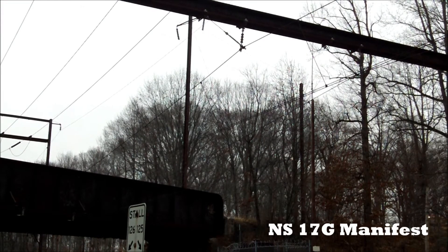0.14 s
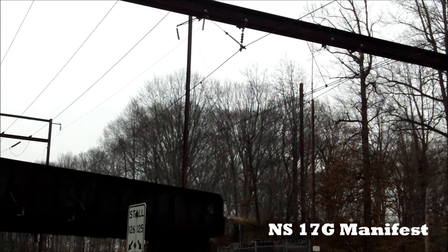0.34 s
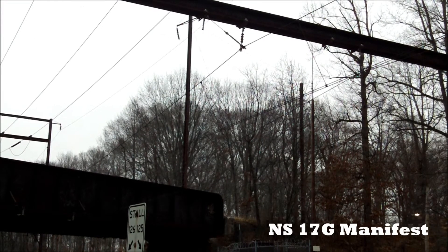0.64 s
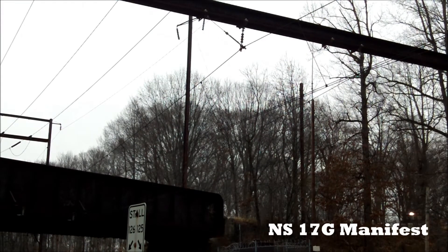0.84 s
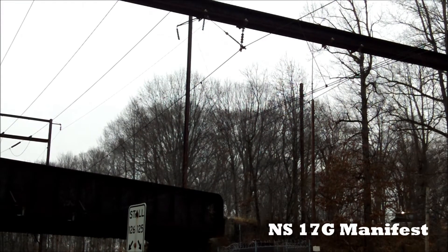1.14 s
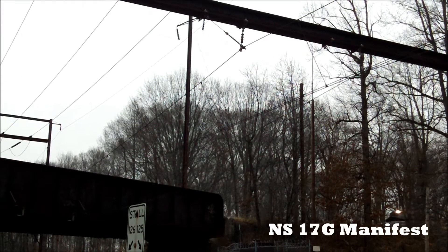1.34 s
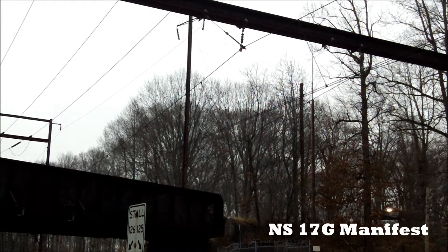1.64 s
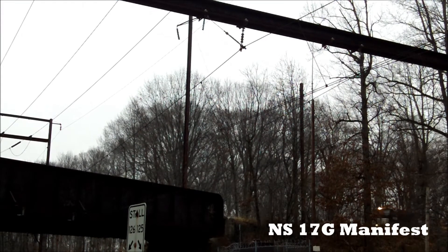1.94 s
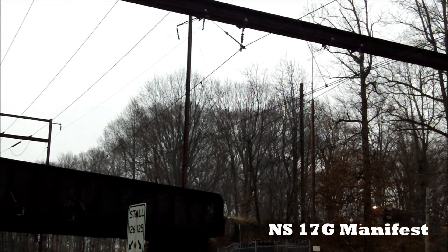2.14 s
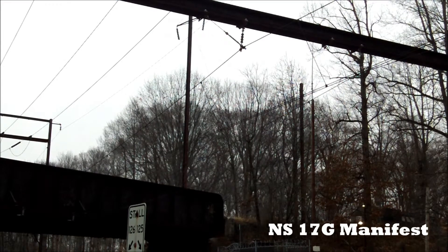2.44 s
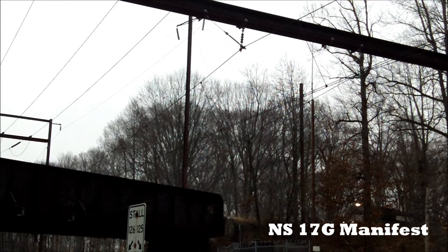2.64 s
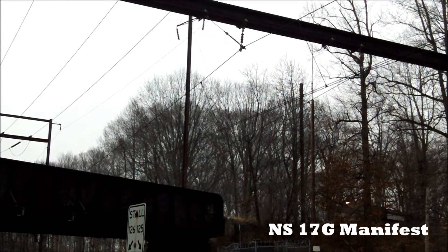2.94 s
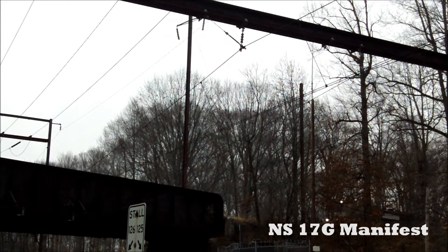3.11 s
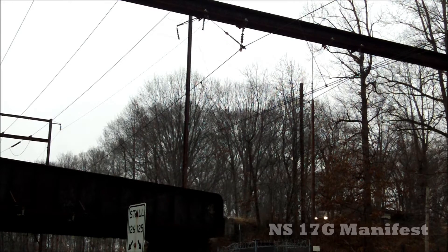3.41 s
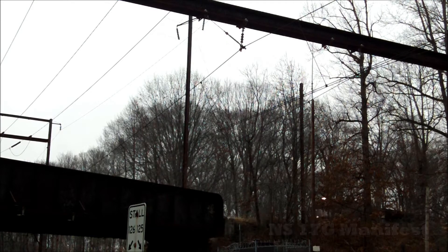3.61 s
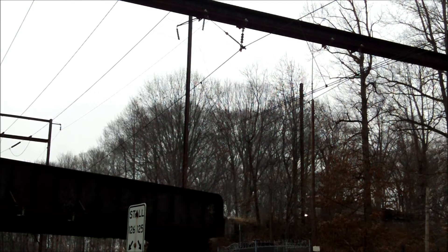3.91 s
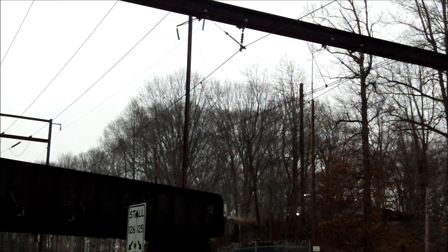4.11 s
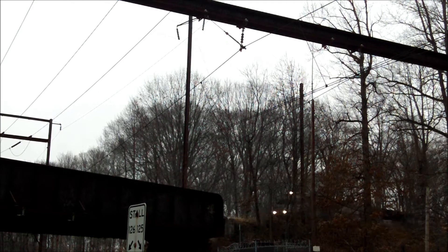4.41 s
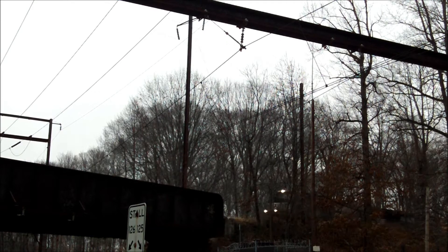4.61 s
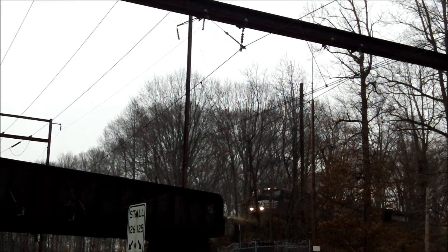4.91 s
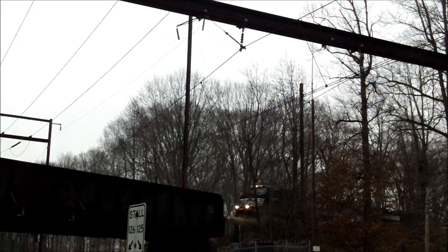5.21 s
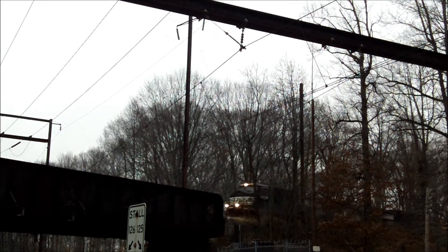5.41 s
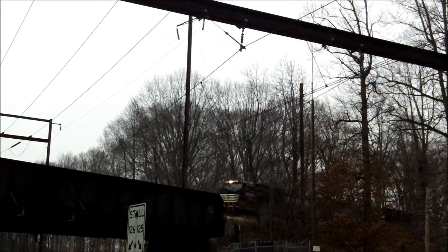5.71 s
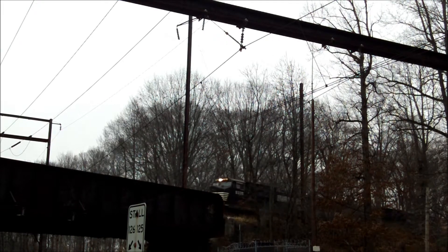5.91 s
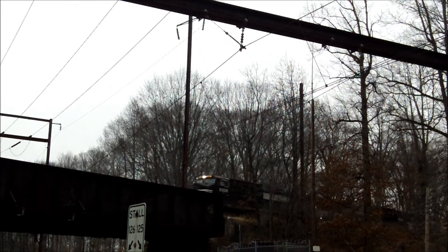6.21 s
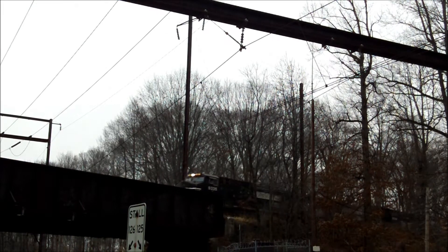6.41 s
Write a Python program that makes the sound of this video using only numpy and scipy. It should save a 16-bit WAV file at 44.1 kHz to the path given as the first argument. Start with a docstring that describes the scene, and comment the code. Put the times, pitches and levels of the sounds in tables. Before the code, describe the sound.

From beneath a bridge, a nearing diesel locomotive is a deep, pulsing beat with ground rumble and rushing wheel noise. Close drips splat before a valve releases a hiss of air. The bass peaks just past the middle and fades, while the wheels roar on with a faint fan whine, short swells of hum and a howl from the rails. Another loud hiss and one brief spurt of air come last.

```python
"""Diesel locomotive from under a steel bridge

A small camera under the bridge hears the engine climb towards it through bare woods. The uneven exhaust
beat throbs in the bass until the bank masks it; wheels and fans roar, and air valves blow off twice and
spit once. Drips tick close to the microphone, and the camera adds hiss and a thin whine."""
import sys
import numpy as np
from scipy import signal
from scipy.fft import rfft, irfft, next_fast_len
from scipy.io import wavfile
from scipy.ndimage import uniform_filter1d, map_coordinates

SR = 44100
rng = np.random.default_rng(int(sys.argv[2]) if len(sys.argv) > 2 else 0)


def int16_out(signal):
    """Quantize to a 16-bit WAV file."""
    q = np.round(np.clip(np.atleast_2d(signal).T, -1, 1) * 32767)
    wavfile.write(sys.argv[1], SR, q.astype(np.int16))


N = 288855

CYCLE_HZ = 4.9455  # engine cycles of two crank turns
STACK_HZ, STACK_WIDTH_HZ = 67.8, 30
DRONE_HZ, DRONE_CREST_S = 64.084, .0038  # just under the 13th engine order
CAMERA_WHINE_HZ, FRAME_HZ, BAND_LIMIT_HZ = 14985, 29.97, 15300

# The twelve cylinders. Each row: crank angle in degrees, relative puff strength in dB.
CYLINDERS = [(107, -34.2), (141, -48.0), (195, -35.5), (249, -37.7), (316, -39.0), (367, -31.8),
             (450, -34.7), (510, -39.9), (533, -40.8), (634, -37.3), (698, -32.5), (719, -30.8)]
# The engine from under the bridge. Each row: time in seconds, exhaust beat in dB, ground rumble in dB.
ENGINE_LEVELS = [(0, -22.5, -30), (2.0, -23, -24), (3.3, -22, -28), (3.9, -18.5, -26), (4.45, -36.5, -24),
                 (5.2, -32, -24), (5.65, -59.5, -27), (5.9, -50, -25), (6.55, -63, -20.5)]
# The bass drone and the gears. Each row: time in seconds, level in dB.
DRONE_LEVELS = [(0, -27), (.5, -25), (1.2, -30), (2.65, -43), (3.05, -27), (3.7, -21.5), (3.9, -17),
                (4.15, -16), (4.3, -20), (4.5, -33), (5.2, -50), (5.9, -50), (6.55, -28)]
GEAR_LEVELS = [(0, -56), (1.9, -51.5), (3.0, -42.5), (3.9, -47), (4.3, -53), (5.3, -57), (6.55, -44)]
# Wheels on the rail. Each row: time in seconds, roar in dB, sizzle in dB.
WHEEL_LEVELS = [(0, -35.5, -50), (1.2, -35, -50), (1.8, -33.5, -52), (2.3, -34.5, -49), (2.7, -32.5, -45),
                (3.6, -32.5, -45), (4.1, -33.5, -48.5), (5.5, -34, -48), (5.9, -32.5, -44),
                (6.55, -32.5, -50)]
# Rail howl and blower whine. Each row: time in seconds, pitch in Hz, level in dB.
HOWL_PATH = [(0, 645, -54), (2.4, 665, -49.5), (3.6, 632, -41.5), (4.8, 632, -44.5), (5.5, 590, -37.5),
             (5.9, 563, -37.5), (6.55, 568, -37)]
BLOWER_PATH = [(0, 1045, -62), (.85, 1045, -56), (1.15, 1048, -48), (2.3, 1048, -52), (2.9, 1045, -47),
               (3.8, 1042, -43.5), (4.3, 1035, -49), (4.9, 960, -49), (5.7, 910, -51), (6.55, 865, -50)]
# Swells of motor hum. Each row: centre in seconds, half length in seconds, peak in dB.
MOTOR_SWELLS = [(3.22, 0.076, -44.5), (3.68, 0.077, -39), (4.107, 0.089, -42.5), (4.596, 0.17, -43),
                (5.06, 0.16, -38), (5.55, 0.06, -35), (5.762, 0.046, -40), (5.98, 0.08, -35.5),
                (6.186, 0.057, -34.5)]
# Two soft tones. Each row: centre in seconds, half length in seconds, pitch in Hz, peak in dB.
SOFT_TONES = [(0.293, 0.15, 875, -42), (0.593, 0.11, 755, -44.5)]
# Drips by the microphone. Each row: start in seconds, ping gain in dB, ping pitch in Hz,
# smack gain in dB, smack pitch in Hz, seconds to fade by 60 dB.
LOUD_DRIPS = [(.2975, -44, 9500, -28, 3900, .025), (.4723, -48, 11000, -8, 1900, .012),
              (.5217, -52, 9500, -42, 4500, .008), (.7058, -32, 9800, -23, 5950, .02),
              (.7194, -54, 8900, -46, 5700, .04), (.7771, -51, 10600, -57, 5500, .012),
              (.9438, -50, 11000, -60, 5000, .012), (2.5701, -45, 10000, -58, 5000, .05),
              (2.6165, -43, 10000, -54, 6000, .012), (2.6658, -47, 9600, -30, 3000, .012)]
# Air blasts. Each row: start in seconds, level in dB, treble rise in seconds, hold in seconds,
# fade in dB a second, treble share in dB.
AIR_BLASTS = [(1.07, -36.5, 0.068, 0.22, 23, -6), (5.718, -33, 0.094, 0.11, 22, -2),
              (6.408, -39, 0.016, 0.02, 226, -3.5)]
# Whistles in the jet. Each row: pitch in Hz, width in Hz, relative strength in dB.
JET_WHISTLES = [(2560, 42, 14.5), (2960, 63, 4.5), (3050, 11, 7.5), (3300, 53, -14)]

# The colour of each noise. Each row: frequency in Hz, relative spectral density in dB.
GROUND_SPECTRUM = [(8, -25.5), (18, -19), (40, -4.5), (62, -0.5), (85, -5.5), (110, -16.5), (140, -32.5),
                   (200, -59)]
ROAR_SPECTRUM = [(90, -62), (128, 3), (146, 3.5), (165, -4.5), (240, -0.5), (300, -2), (480, -3),
                 (800, -5.5), (1050, -4.5), (1500, -9), (2000, -16), (2300, -25), (4000, -39), (6000, -85)]
SIZZLE_SPECTRUM = [(900, -37), (1700, -2), (2000, -2), (2200, -4), (3800, -13.5), (5500, -22.5),
                   (7000, -34.5), (9500, -44.5), (15000, -72.5)]
JET_BODY_SPECTRUM = [(500, -33), (900, -4), (1600, 2.5), (2500, -1.5), (3500, -6.5), (5500, -39.5)]
JET_EDGE_SPECTRUM = [(1900, -18.5), (2650, 0.5), (3500, 1.5), (4600, -3.5), (6000, -11.5), (7400, -20),
                     (8200, -44)]
JET_SPRAY_SPECTRUM = [(7000, -21), (8800, 2), (10500, -1.5), (12500, -6), (15300, -13.5)]
HISS_SPECTRUM = [(5000, -34.5), (8000, -3), (9500, -3.5), (12800, -0.5), (14000, -2), (15300, -6)]
SIDE_HISS_SPECTRUM = [(400, -25.5), (1400, -14.5), (4000, -10), (8000, -3), (14500, 3), (15300, -1)]


def amp(db):
    return 10 ** (np.asarray(db) / 20)


def unit(x):
    return x / np.sqrt(np.mean(x ** 2) + 1e-20)


def curves(rows):
    """One value per sample for each column after the time."""
    times, *columns = np.transpose(rows)
    return [np.interp(np.arange(N) / SR, times, column) for column in columns]


def wobble(rate):
    """A smooth random curve, rate knots a second."""
    return map_coordinates(rng.standard_normal(int(N * rate / SR) + 4), [np.arange(N) * rate / SR])


def filtered(x, response):
    """x through a frequency response."""
    size = next_fast_len(len(x) + SR)
    return irfft(rfft(x, size) * response(np.fft.rfftfreq(size, 1 / SR)), size)[:len(x)]


def shape(points):
    """A response through (Hz, dB) points on a log axis."""
    f, db = np.transpose(points)
    return lambda hz: amp(np.interp(np.log(hz + 1), np.log(f + 1), db, -120, -120))


def resonance(f, hz, width_hz):
    """Response at f of one resonance with peak gain 1."""
    return 1j * f * width_hz / (hz * hz - f * f + 1j * f * width_hz)


def rush(response, patchy_db):
    """Coloured noise of rms 1 with patches of random gain in time and frequency."""
    spectra = signal.stft(rng.standard_normal(N), nperseg=512)[2]
    patches = uniform_filter1d(uniform_filter1d(rng.standard_normal(spectra.shape), 5, 0), 16, 1)
    noise = signal.istft(spectra * amp(patchy_db * unit(patches)), nperseg=512)[1][:N]
    return unit(filtered(noise, response))


def wavering(hz, waver_hz, rate):
    """A sine of rms 1 whose pitch wanders."""
    return np.sqrt(2) * np.sin(2 * np.pi * np.cumsum(hz + waver_hz * wobble(rate)) / SR)


def swell(t, centre, half_length, peak_db):
    """A bell-shaped gain curve."""
    return amp(peak_db - 9.2 * ((t - centre) / half_length) ** 2)


def dip_db(t):
    """A brief drop in level shared by wheels, gears, rail and blower."""
    return -2.5 * np.exp(-((t - 4.24) / .12) ** 2)


def engine(t):
    """Each cylinder puffs once a cycle into the stack; a drone beats against it, the ground rumbles."""
    beat_db, rumble_db = curves(ENGINE_LEVELS)
    drone_db, = curves(DRONE_LEVELS)
    angle, puff_db = np.transpose(CYLINDERS)
    cycles = np.arange(int(N / SR * CYCLE_HZ) + 1)[:, None]
    firings = np.round((cycles + angle / 720) / CYCLE_HZ * SR).astype(int)
    strengths = amp(puff_db + .6 * rng.standard_normal(firings.shape))
    puffs = np.bincount(firings.ravel(), strengths.ravel(), N)
    # the stack rings twice over; the silencer stops the upper orders
    exhaust = lambda f: resonance(f, STACK_HZ, STACK_WIDTH_HZ) ** 2 / (1 + (f / 108) ** 8)
    beat = unit(filtered(puffs, exhaust)[:N])
    drone = np.sqrt(2) * np.cos(2 * np.pi * DRONE_HZ * (t - DRONE_CREST_S))
    rumble = rush(shape(GROUND_SPECTRUM), patchy_db=.47)
    return amp(beat_db) * beat + amp(drone_db) * drone + amp(rumble_db) * rumble


def wheels(t):
    """Wheels roll on the rail: a broad roar with a sizzle above it."""
    roar_db, sizzle_db = curves(WHEEL_LEVELS)
    roar = amp(roar_db + dip_db(t) + .061 * wobble(3.6)) * rush(shape(ROAR_SPECTRUM), patchy_db=.7)
    sizzle_gain = amp(sizzle_db + 1.5 * dip_db(t) + .56 * wobble(6.3))
    return roar + sizzle_gain * rush(shape(SIZZLE_SPECTRUM), patchy_db=.7)


def rail_howl(t):
    """The rail howls in a drifting band: slow noise shifted up to the howl's pitch."""
    hz, db = curves(HOWL_PATH)
    slow_noise = rush(lambda f: 1 / (1 + (f / 52) ** 4), patchy_db=-.6)
    return amp(db + dip_db(t)) * slow_noise * wavering(hz, waver_hz=8.31, rate=5)


def gears(t):
    """Gears grind in a rough band near 2 kHz."""
    db, = curves(GEAR_LEVELS)
    band = shape([(1500, -26.5), (1850, 4), (2030, 3.5), (2150, -27)])
    return amp(db + dip_db(t)) * rush(band, patchy_db=2.5)


def motor(t):
    """An unsteady hum comes in short swells over a slowly growing floor."""
    floor = amp(-62 + 2 * t)
    swells = sum(swell(t, *row) for row in MOTOR_SWELLS)
    return (floor + swells) * wavering(209.5, waver_hz=3, rate=14)


def blower(t):
    """The fan's fluttering whine sinks as the engine draws level with the microphone."""
    hz, db = curves(BLOWER_PATH)
    flutter_db = 2.2 * wobble(16) + 2.5 * wobble(3.09)
    return amp(db + dip_db(t) + flutter_db) * wavering(hz, waver_hz=9, rate=14)


def soft_tones(t):
    """Two short tones from the machinery, the second lower."""
    return sum(swell(t, centre, half_length, db) * wavering(hz, waver_hz=1.8, rate=6.9)
               for centre, half_length, hz, db in SOFT_TONES)


def drips():
    """Drops splat close to the microphone, each a high ping over a lower smack and a knock."""
    faint = [(N / SR * when, -60 - 2 * np.log(size), 8500 + 5000 * pitch, -64, 5000, .008)
             for when, size, pitch in rng.random((90, 3))]
    ring = lambda x, hz, q: signal.lfilter(*signal.iirpeak(hz, q, SR), x)
    ring_twice = lambda x, hz, q: ring(ring(x, hz, q), hz, q)
    out, age = np.zeros(N + SR), np.arange(SR // 16) / SR
    for start, ping_db, ping_hz, smack_db, smack_hz, t60 in LOUD_DRIPS + faint:
        envelope = amp(-60 * age / t60) * np.clip(age / .00048, 0, 1)
        splat = envelope * rng.standard_normal((2, len(age)))
        ping = ring(splat[0], ping_hz, q=2.5)
        knock = amp(10) * ring_twice(splat[0], hz=2200, q=1.5)
        smack = ring_twice(splat[1], smack_hz, q=3.5)
        out[round(start * SR):][:len(age)] += amp(ping_db) * (ping + knock) + amp(smack_db) * smack
    return out[:N]


def air_valves(t):
    """Compressed air jets out: each blast rises, holds and fades, its treble ahead of its body."""
    whistles = lambda f: sum(amp(db) * abs(resonance(f, hz, width)) for hz, width, db in JET_WHISTLES)
    body = rush(lambda f: shape(JET_BODY_SPECTRUM)(f) * (1 + .25 * whistles(f)), patchy_db=.6)
    edge = rush(shape(JET_EDGE_SPECTRUM), patchy_db=.7)
    spray = rush(shape(JET_SPRAY_SPECTRUM), patchy_db=.8)
    out = np.zeros(N)
    for start, jet_db, rise, hold, fade_db_per_s, treble_db in AIR_BLASTS:
        level = amp(jet_db - fade_db_per_s * np.clip(t - start - rise - hold, 0, None))
        opened = lambda span: np.clip((t - start) / span, 0, 1)
        # distance dulls the jet, the high spray by twice as many dB as the edge
        treble = amp(treble_db) * edge + amp(2 * treble_db - 20.5) * spray
        out += level * (opened(1.3 * rise) * body + opened(rise) * treble)
    return out


def scene():
    """All that reaches the one spot under the bridge, alike in both channels."""
    t = np.arange(N) / SR
    train = engine(t) + wheels(t) + rail_howl(t) + gears(t) + motor(t) + blower(t) + soft_tones(t)
    mono = train + drips() + air_valves(t)
    return np.array([mono, mono])


def record(dry):
    """The camera's one capsule has a notch near 8 kHz; hiss flickers, a whine is chopped once a frame."""
    t = np.arange(N) / SR
    slot = lambda f: 1 - .9 * abs(resonance(f, 7970, 220)) ** 2
    notch = lambda f: slot(f) * (1 - .31 * abs(resonance(f, 7950, 900)) ** 2)
    hiss = amp(-71.5 + 1.5 * wobble(30) + .8 * wobble(1.7)) * rush(shape(HISS_SPECTRUM), patchy_db=1.5)
    chop = 1 - np.exp(4 * (np.cos(2 * np.pi * FRAME_HZ * (t - .028)) - 1))
    whine = amp(-70 + 1.5 * wobble(40)) * chop * np.sin(2 * np.pi * CAMERA_WHINE_HZ * t)
    # a shade more bass on the left, and a faint patchy stereo hiss
    side = amp(-40) * filtered(dry[0], lambda f: 1 / (1 + f / 150))
    side += amp(-83) * rush(shape(SIDE_HISS_SPECTRUM), patchy_db=5)
    channels = [filtered(x + hiss, notch) + whine + sign * side for x, sign in zip(dry, (1, -1))]
    dc_offset = .0071
    return np.array([filtered(x, lambda f: f < BAND_LIMIT_HZ) for x in channels]) + dc_offset


dry = scene()
out = record(dry)
int16_out(out)
```